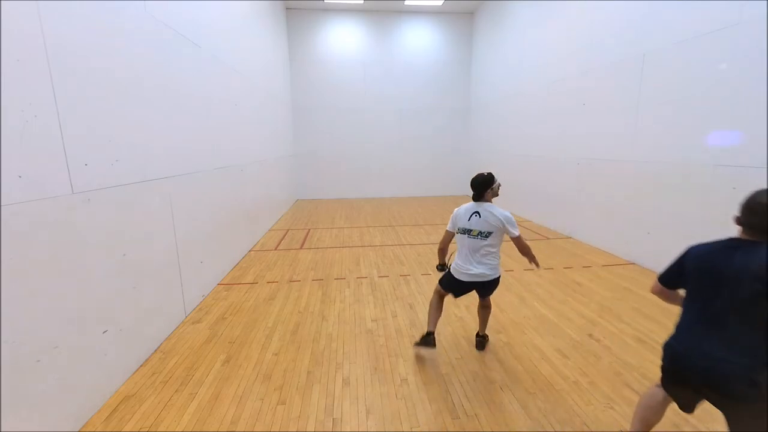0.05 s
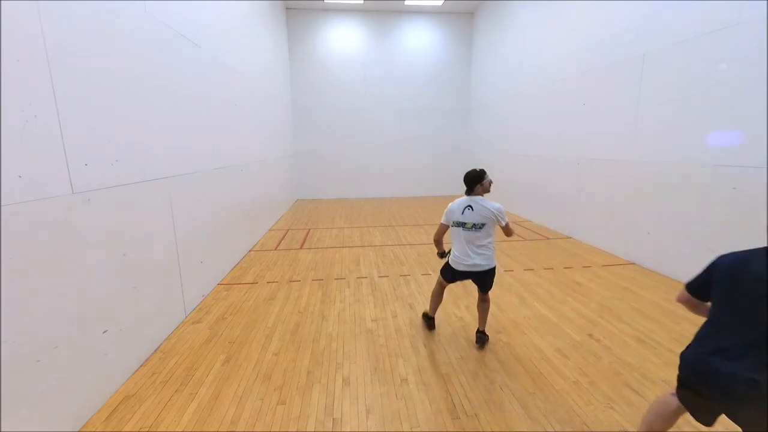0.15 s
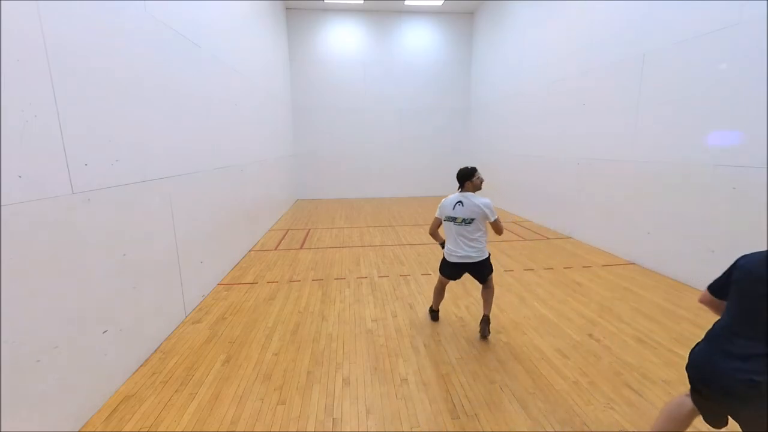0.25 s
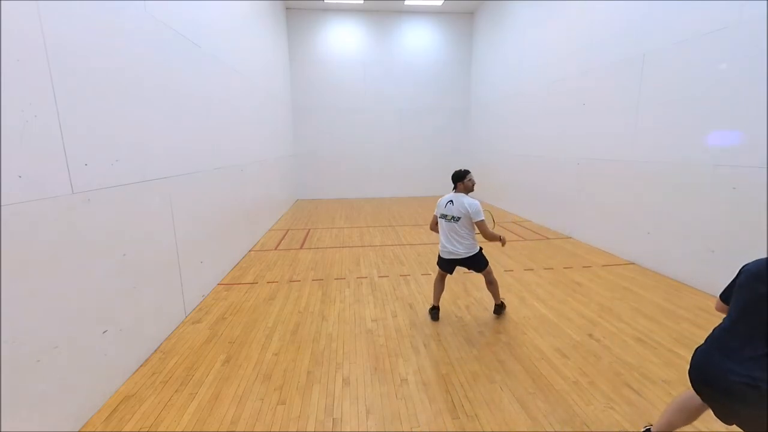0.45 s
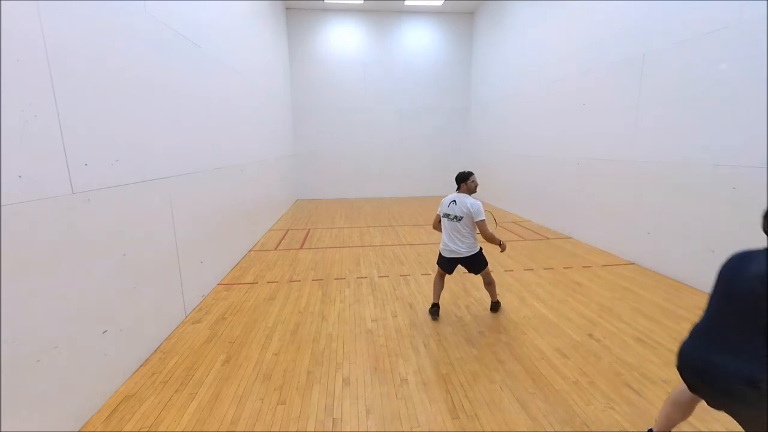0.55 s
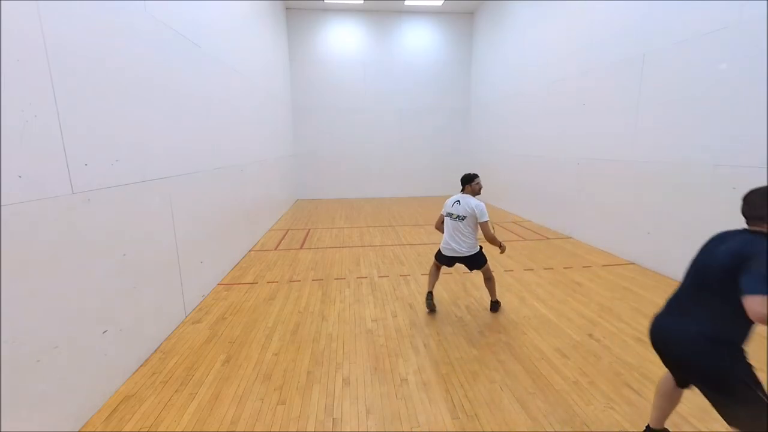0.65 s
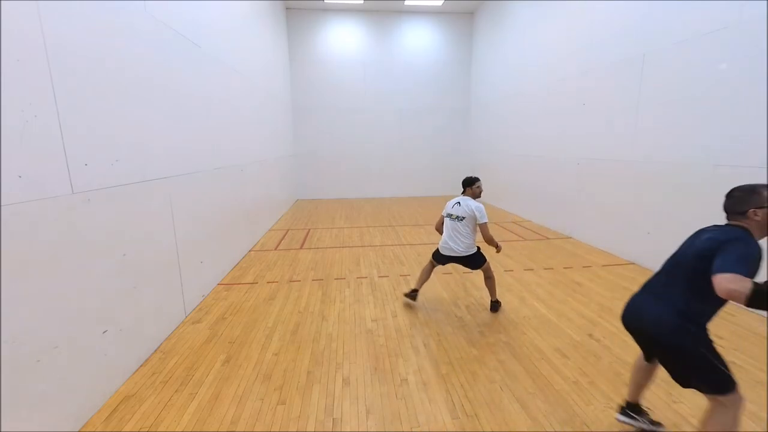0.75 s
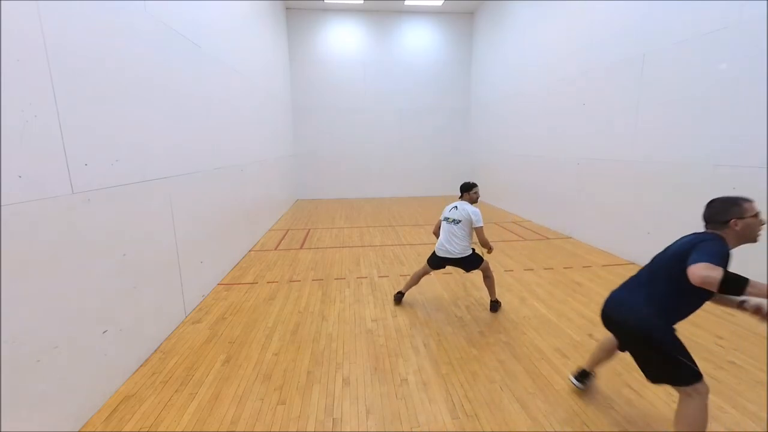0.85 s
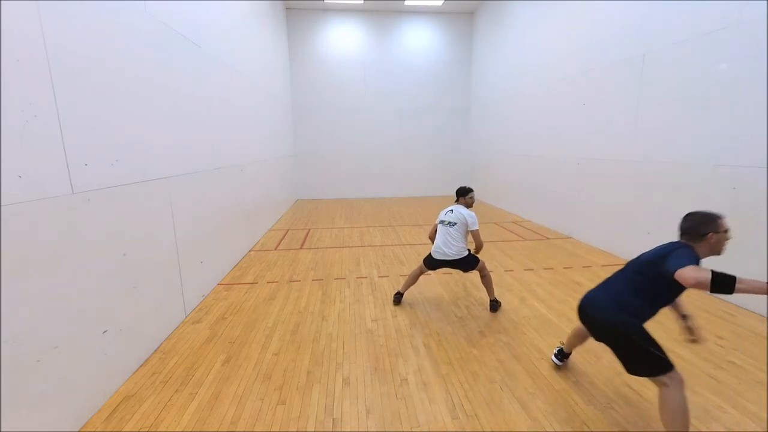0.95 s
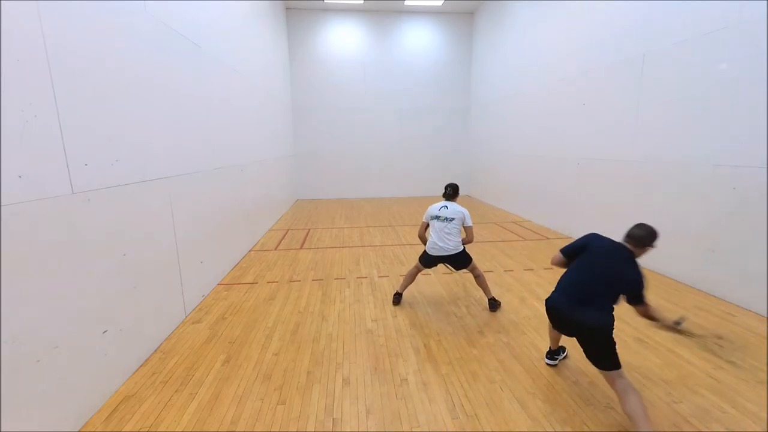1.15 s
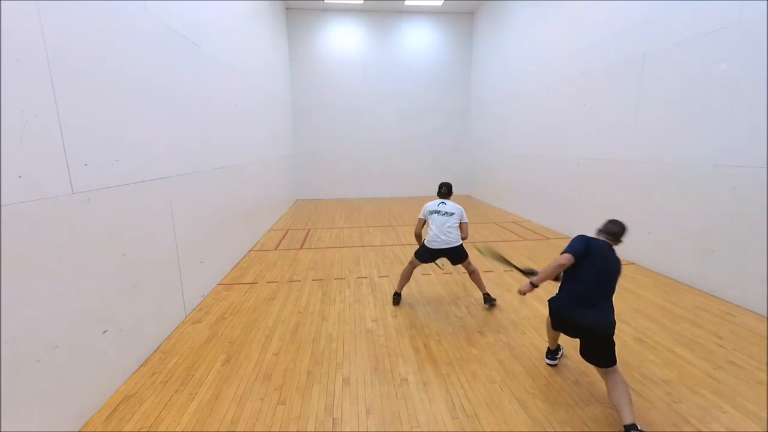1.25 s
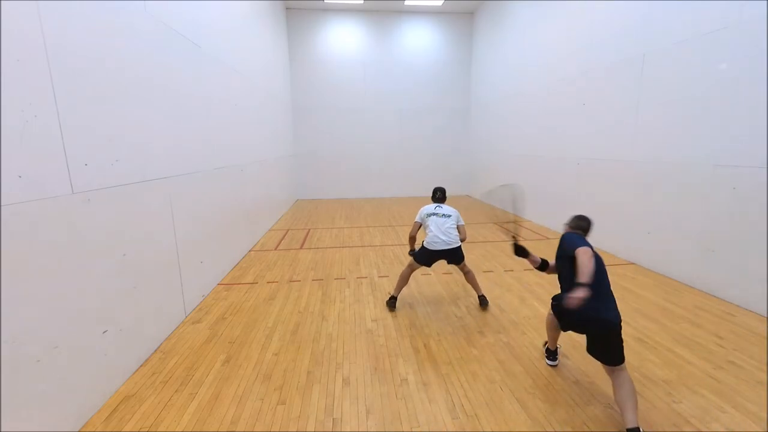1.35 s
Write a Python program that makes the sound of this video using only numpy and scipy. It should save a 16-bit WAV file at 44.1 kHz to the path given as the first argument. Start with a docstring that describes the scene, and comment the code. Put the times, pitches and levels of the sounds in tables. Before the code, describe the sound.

Heard from the back of an echoing wooden-floored court: a faint footfall, a violent double crack of the ball with hollow ringing, a double shoe thud, then a quieter racquet tap overlapped by a short squeak.

```python
"""A low hum, ventilation and a light footfall open a racquetball rally, heard from the back wall of a court.
A hard shot cracks as broadband contacts, rings on in the ball's modes and overloads the microphone.
Shoes thud, slap and scuff as shaped noise; a sole squeaks by stick-slip under a soft racquet return.
Hard walls and a wooden floor echo the ball, racquet, squeak and shoes: these are convolved with
decaying noise."""
import sys
import numpy as np
from scipy import signal
from scipy.fft import rfft, irfft, next_fast_len
from scipy.io import wavfile
from scipy.ndimage import uniform_filter1d, map_coordinates

SR = 44100
rng = np.random.default_rng(int(sys.argv[2]) if len(sys.argv) > 2 else 0)


def to_wav(sig):
    """Store sig (one row per channel, or 1-D mono) as 16-bit WAV at the path in sys.argv[1].

    Samples outside -1..1 are clipped; the rate is SR.
    """
    pcm = np.clip(np.atleast_2d(sig), -1, 1) * 32767
    pcm = np.round(pcm).astype(np.int16)
    wavfile.write(sys.argv[1], SR, pcm.T)  # frames by channels


N = 61739  # samples in the scene

FFT_SIZE = next_fast_len(N, real=True)
FREQS = np.fft.rfftfreq(FFT_SIZE, 1 / SR)

# ball and racquet: contact times [s], shares and relative levels [dB]
CRACK_S, RING_RISE_S, RING_DIRECT, RING_ROOM_DB = 0.0046, 0.0052, 0.86, -16.5
TICK_S, STRING_RISE_S, TICK_DB, RACQUET_ROOM_DB = 0.0027, 0.0022, -24.5, -3

# squeak: rms pitch jitter as a share of the pitch, and gain of the unechoed sound
SQUEAK_JITTER, SQUEAK_DRY = .05, 0.51

# background: relative levels [dB] and hum frequency [Hz]
AIR_DB, HUM_HZ, HUM_DB = -38.5, 121.2, -50.5

# court: build-up [s], first arrival (gain, smear [s]) and the return from the far wall ([s], [dB])
BUILD_S, DIRECT, DIRECT_SMEAR_S = 0.0033, .3, 0.00004
ROUND_TRIP_S, ROUND_TRIP_DB = 0.092, -20.5

# two ports: frequency scale [Hz] and limit of their difference, and lag of the left port [s]
DIFFUSE_HZ, DIFFUSE_MAX, PORT_LAG_S = 7000, 0.92, 4.8e-5

# recorder: band edges [Hz], gain and hiss [dB], sharpness of the knee and peak ceiling
LOW_CUT_HZ, TOP_HZ = 15, 15600
DRIVE_DB, HISS_DB = 0.5, -54
KNEE, CEILING = 8, .99


def ball():
    """Impact excitation: broadband contact plus free modal vibration, weighted around a centre frequency."""
    # impacts (time [s], ring level [dB], centre of the ring [Hz], spread [octaves], crack level [dB])
    impacts = [(.2018, 5.5, 740, 0.64, -5.5), (.22, 4, 1340, 0.89, 1.5), (0.493, -28, 1020, 0.2, -56),
               (1.323, -16, 1140, 0.21, -26)]
    # modes of the rubber ball (frequency [Hz], level [dB], t60 [s])
    rubber_modes = [(421, -5, .36), (694, -10, .42), (795, 1, .29), (858, -10, .3), (919, -9, .38),
                    (966, -13, .36), (1077, 0, .4), (1112, -9, .44), (1174, -9, .42), (1388, -15, .46),
                    (1445, -13, .48), (1518, -6, .44), (1572, -9, .4), (1659, -14, .38), (1900, -13, .46),
                    (2231, -7, .42), (2319, -12, .42), (2546, -18, .46), (3025, -14, .32)]
    # spectrum of the crack (frequency [Hz], level [dB])
    crack_shape = [(30, -55), (70, -28), (125, -17), (200, -21), (400, -7.5), (540, -12), (760, -5),
                   (930, -6), (1130, 2.5), (1300, -9), (1550, -2.5), (2000, -9.5), (2300, -6.5),
                   (2800, -14), (3700, -22.5), (4850, -22), (7500, -27.5), (15000, -39.5)]
    rings, cracks = 0, 0
    for s, ring_db, centre_hz, spread, crack_db in impacts:
        excited = []
        for hz, db, t60 in rubber_modes:
            octaves = np.log2(hz / centre_hz)
            excited.append((hz, db - 3 * (octaves / spread) ** 2, t60))
        rings = rings + at(undb(ring_db) * ring(excited, RING_RISE_S), s)
        cracks = cracks + at(undb(crack_db) * push(CRACK_S), s)
    into_room = undb(RING_ROOM_DB) * rings + colour(cracks, crack_shape)
    return RING_DIRECT * rings + echo(into_room)


def racquet():
    """Struck strings and frame: a short contact tick, then the free decay of the modes."""
    # strokes (time [s], level [dB])
    strokes = [(1.2505, -17)]
    # modes of strings and frame (frequency [Hz], level [dB], t60 [s])
    string_modes = [(685, -9, 0.048), (1036, 11, 0.026), (1345, 4, 0.018), (1617, -3.5, 0.047),
                    (2113, -15, 0.093), (2730, -30, 0.17)]
    # spectrum of the string tick (frequency [Hz], level [dB])
    tick_shape = [(30, -50), (120, -6), (300, 8), (800, 8.5), (2000, 1), (5000, -12.5), (15000, -27)]
    rings = sum(at(undb(db) * ring(string_modes, STRING_RISE_S), s) for s, db in strokes)
    # ticks have one level, whatever the stroke
    ticks = sum(at(undb(TICK_DB) * push(TICK_S), s) for s, _ in strokes)
    into_room = undb(RACQUET_ROOM_DB) * rings + colour(ticks, tick_shape)
    return rings + echo(into_room)


def squeak():
    """Stick-slip friction on varnish: a jittery harmonic tone rises as the weight comes on, then falls."""
    # squeak of a planted sole (time [s], pitch before jitter [Hz], level [dB])
    glide = [(1.251, 640, -23), (1.272, 785.3, -23.5), (1.291, 881.4, -17), (1.307, 911.6, -18),
             (1.321, 1091, -16.5), (1.355, 1089, -24.5), (1.379, 1000, -13.5), (1.395, 930, -50)]
    # overtones (multiple of the pitch, level [dB])
    overtones = [(1, -0.5), (2, -21), (3, -24.5), (4, -26), (5, -33), (6, -32)]
    t = clock()
    s, hz, db = np.array(glide).T
    jitter = unit(uniform_filter1d(rng.standard_normal(N), size=90))
    pitch = np.interp(t, s, hz) * (1 + SQUEAK_JITTER * jitter)
    phase = 2 * np.pi * np.cumsum(pitch) / SR
    force = np.interp(t, s, undb(db), left=0, right=0)
    force = uniform_filter1d(force, size=130)  # rounds the corners
    tone = force * sum(undb(part_db) * np.sin(round(k) * phase) for k, part_db in overtones)
    return SQUEAK_DRY * tone + echo(tone)


def shoes():
    """Impact and sliding friction: heels thud and soles slap the boards as brief contacts, scuffs rub."""
    # footfalls (time [s], thud level [dB], slap level [dB], decay time of the trail [s])
    footfalls = [(0.031, -42, -45, 0.024), (0.723, -23.5, -23.5, 0.0096), (0.737, -24, -24.5, 0.01),
                 (.86, -40.5, -35.5, 0.024), (1.162, -42, -56, 0.045)]
    # slides of a sole (time [s], level [dB], time scale of the fade [s])
    slides = [(0.12, -43, 0.029), (0.566, -34, 0.075)]
    # spectrum of a heel on the boards (frequency [Hz], level [dB])
    thud_shape = [(30, -17), (80, -17.5), (140, -3.5), (220, -3.5), (300, -3.5), (400, 1), (520, -1),
                  (900, -1), (2000, -20), (8000, -56)]
    # spectrum of a sole slapping the boards (frequency [Hz], level [dB])
    slap_shape = [(30, -41), (200, -28), (600, -8.5), (950, 0.5), (1400, -0.5), (1900, -7), (4100, -12.5),
                  (5000, -31.5), (7700, -27.5), (10000, -37), (15000, -38)]
    # spectrum of a sliding sole (frequency [Hz], level [dB])
    scuff_shape = [(100, -38), (500, -8), (1400, 0.5), (2500, -12), (3600, -7.5), (4800, -7.5), (5800, -49),
                   (12000, -41)]
    t = clock()
    thuds, slaps, rubs = 0, 0, 0
    for s, thud_db, slap_db, length in footfalls:
        thuds = thuds + at(undb(thud_db) * push(length), s)
        slaps = slaps + at(undb(slap_db) * push(length), s)
    for s, db, length in slides:
        rub = rng.standard_normal(N) * t * np.exp(-(t / length) ** 2)
        rubs = rubs + at(undb(db) * blow(rub), s)
    return echo(colour(thuds, thud_shape) + colour(slaps, slap_shape) + colour(rubs, scuff_shape))


def ring(modes, rise):
    """Modal superposition: exponentially decaying sines that swell over the contact time."""
    t = clock()
    total = 0
    for hz, db, t60 in modes:
        decay = np.exp(-np.log(1000) * t / t60)
        total = total + undb(db) * np.sin(2 * np.pi * hz * t) * decay
    return (1 - np.exp(-t / rise)) * total


def push(length):
    """Impulsive contact: a single click with a rough, exponentially fading trail."""
    t = clock()
    trail = rng.standard_normal(N) * np.exp(-t / length)
    return blow((t == 0) + 0.63 * trail / np.linalg.norm(trail))


def blow(x):
    """Energy normalisation: a short sound gets the energy of 35 ms at unit rms."""
    return x / np.linalg.norm(x) * np.sqrt(.035 * SR)


def echo(x):
    """Linear room acoustics: convolution with the court's response at two ports."""
    return signal.fftconvolve(x[None], court(), axes=1)[:, :N]


def court():
    """Diffuse reverberation: a soft first arrival, a dense wash, its far-wall return and a late tail."""
    # decay by band (centre [Hz], early t60 [s], late t60 [s], level of the late tail [dB])
    decays = [(103, 0.85, 1.2, -24), (381, 0.48, 0.93, -24), (1000, 0.42, 2.67, -27.5),
              (2230, 0.38, 1.85, -27.5), (4700, 0.3, 3, -31), (12100, 0.28, 0.25, -10.5)]
    t, noise, out = clock(), diffuse(), 0

    def swell(age, t60):
        """Build-up of the echoes against exponential absorption."""
        return (1 - np.exp(-age / BUILD_S)) * np.exp(-np.log(1000) * age / t60)

    for hz, early, late, late_db in decays:
        # each band fades into its neighbours
        weight = along([(row[0], row[0] == hz) for row in decays])
        band = wave(noise * weight)
        back = undb(ROUND_TRIP_DB) * swell(np.maximum(t - ROUND_TRIP_S, 0), early)
        wash = np.hypot(swell(t, early), back)
        out = out + band * (wash + undb(late_db) * swell(t, late))
    out = out / np.linalg.norm(out[0])
    first = np.exp(-t / DIRECT_SMEAR_S)
    return out + DIRECT * first / first.sum()


def diffuse():
    """Spatial coherence: spectrum of noise at two close ports, alike in the bass, apart in the treble."""
    mid, side = rfft(rng.standard_normal((2, FFT_SIZE)))
    share = np.minimum(FREQS / DIFFUSE_HZ + 0.02, DIFFUSE_MAX)
    signs = np.array([[1], [-1]])
    return (mid + signs * share * side) / np.sqrt(1 + share ** 2)


def colour(x, points):
    """Minimum-phase filtering: a causal response of unit energy with the given (Hz, dB) shape."""
    cepstrum = wave(np.log(undb(along(points))))
    # folding the cepstrum onto positive times makes the response causal
    folded = np.r_[cepstrum[0], 2 * cepstrum[1:N // 2]]
    response = wave(np.exp(rfft(folded, FFT_SIZE)))[:SR // 20]
    return signal.oaconvolve(x, response / np.linalg.norm(response))[:N]


def along(points):
    """Logarithmic frequency scale: (Hz, value) points interpolated at every frequency."""
    p = np.array(points, float)
    return np.interp(np.log(FREQS + 1), np.log(p[:, 0]), p[:, 1])


def wave(spectrum):
    """Fourier synthesis: the waveform of a spectrum."""
    return irfft(spectrum, FFT_SIZE)[..., :N]


def at(x, s):
    """Time shift: the sound starts at s seconds."""
    return np.r_[np.zeros(max(int(s * SR), 0)), x][:N]


def unit(x):
    """Power normalisation to unit rms."""
    return x / np.sqrt(np.mean(x ** 2))


def undb(db):
    """Decibel law: level to amplitude ratio."""
    return 10 ** (np.asarray(db) / 20)


def clock():
    """Sampled time axis in seconds."""
    return np.arange(N) / SR


def background():
    """Stationary diffuse noise: ventilation and lingering echoes, with a low electric hum as a sine."""
    # spectrum of ventilation and lingering echoes (frequency [Hz], level [dB])
    air_shape = [(25, -17), (50, -8), (85, -32), (150, -8.5), (250, -7.5), (400, -4), (520, -3),
                 (700, -8.5), (920, 4.5), (1100, -3), (1400, -7), (2000, -11.5), (3000, -14), (4300, -21.5),
                 (6500, -36), (14000, -31.5)]
    air = unit(wave(diffuse() * undb(along(air_shape))))
    hum = unit(np.sin(2 * np.pi * HUM_HZ * clock()))
    return undb(AIR_DB) * air + undb(HUM_DB) * hum


def hiss():
    """Uncorrelated noise: a faint even hiss, independent in each channel."""
    # spectrum of the hiss (frequency [Hz], level [dB])
    hiss_shape = [(100, -14), (3000, 5), (7000, 2.5), (11000, 2.5), (15000, -3)]
    noise = rfft(rng.standard_normal((2, FFT_SIZE)))
    return undb(HISS_DB) * unit(wave(noise * undb(along(hiss_shape))))


def scene():
    """Superposition of all sources; the sound reaches the left port a little later."""
    left, right = ball() + racquet() + squeak() + shoes() + background()
    late_left = map_coordinates(left, [np.arange(N) - PORT_LAG_S * SR], mode="nearest")
    return np.array([late_left, right])


def record(dry):
    """Band limiting and saturation: thins the deep bass, adds hiss, flattens loud peaks, cuts the top."""
    low_cut = signal.butter(2, LOW_CUT_HZ, "high", fs=SR, output="sos")
    x = signal.sosfilt(low_cut, dry) * undb(DRIVE_DB) + hiss()
    x = CEILING * x / (1 + np.abs(x) ** KNEE) ** (1 / KNEE)
    top_cut = signal.ellip(8, .2, 70, TOP_HZ, fs=SR, output="sos")
    return signal.sosfilt(top_cut, x)


dry = scene()
out = record(dry)
to_wav(out)
```